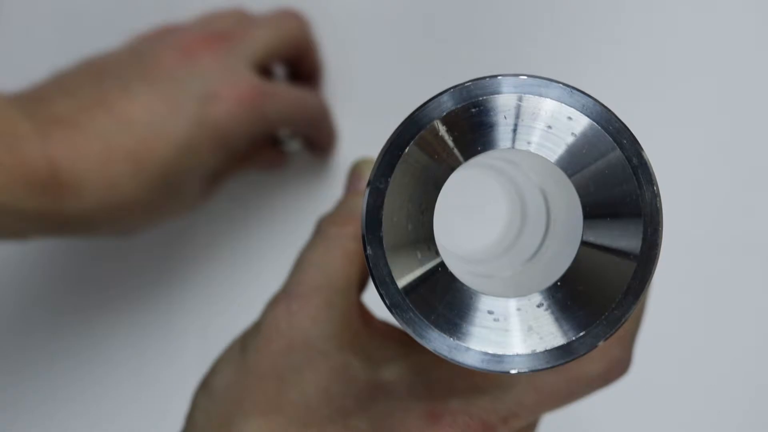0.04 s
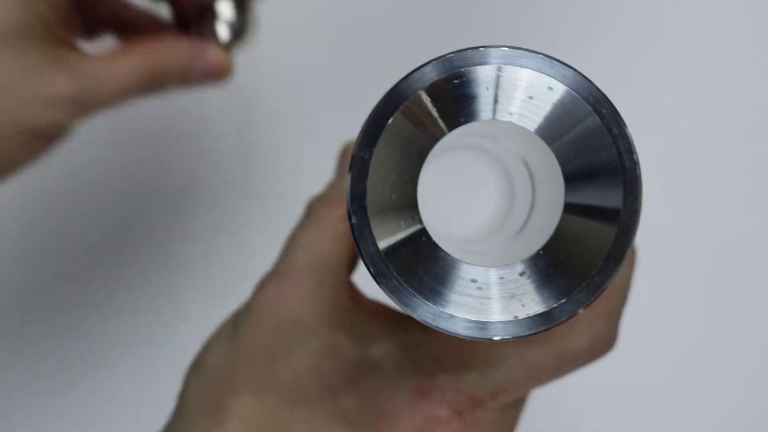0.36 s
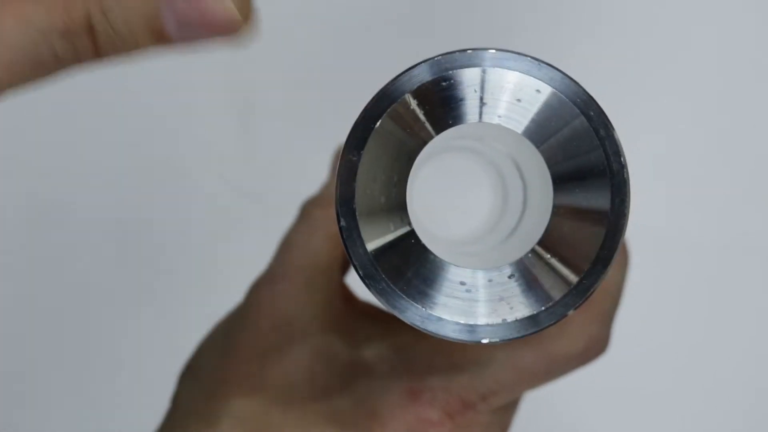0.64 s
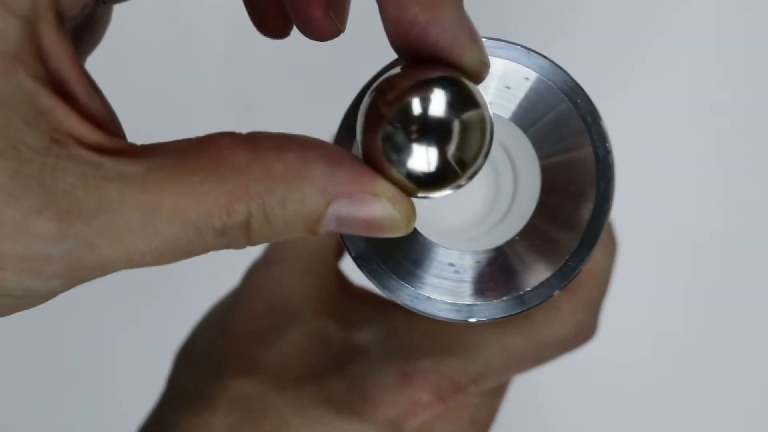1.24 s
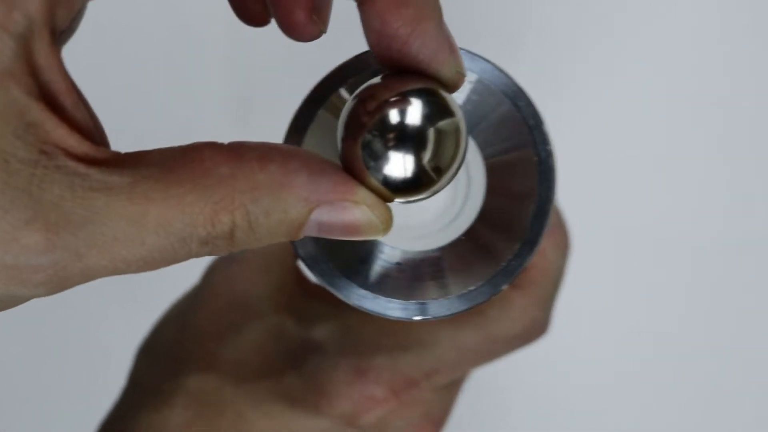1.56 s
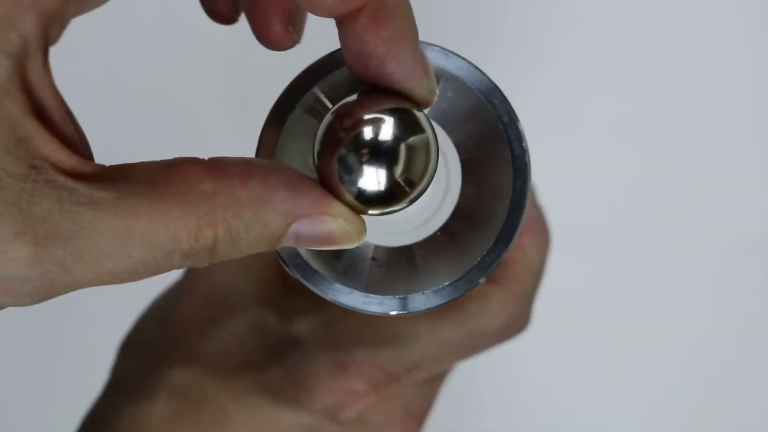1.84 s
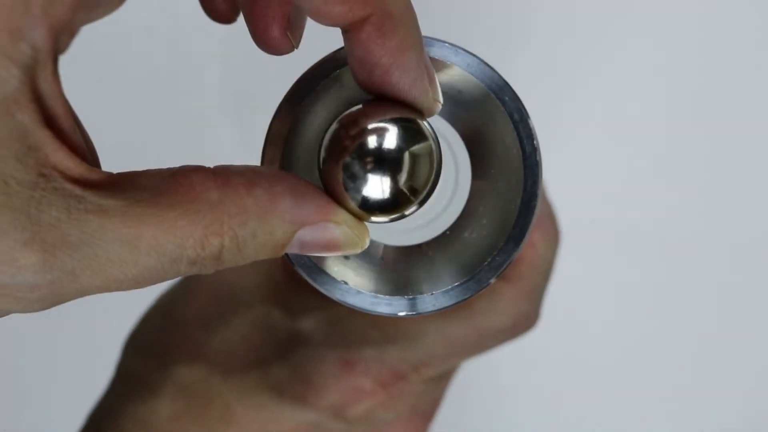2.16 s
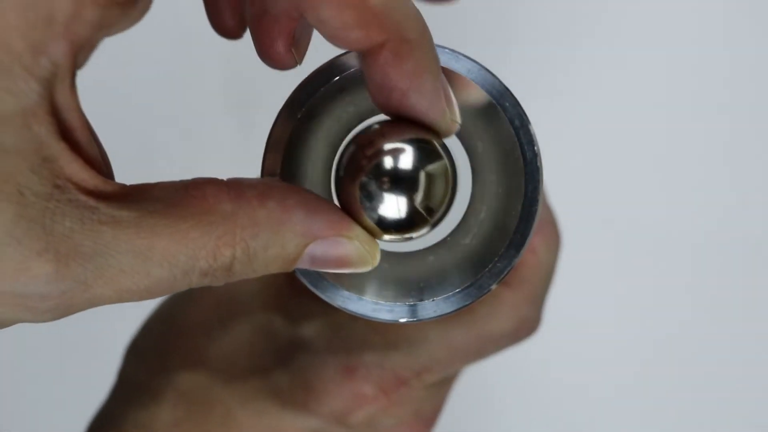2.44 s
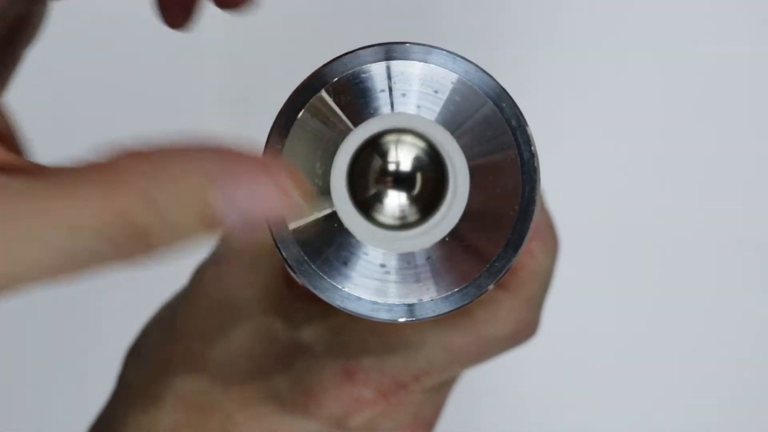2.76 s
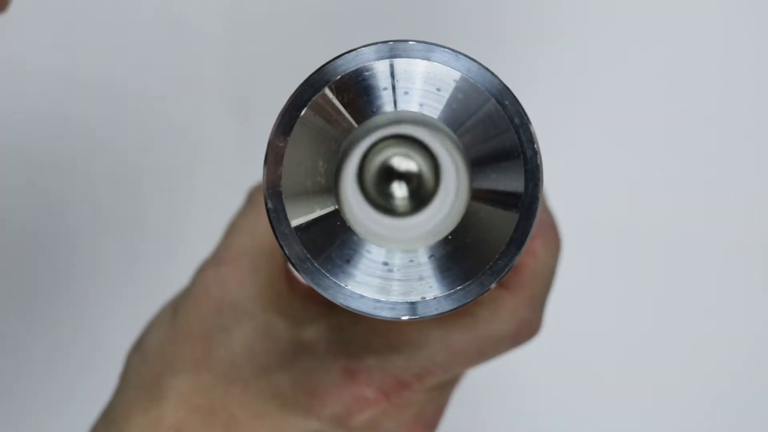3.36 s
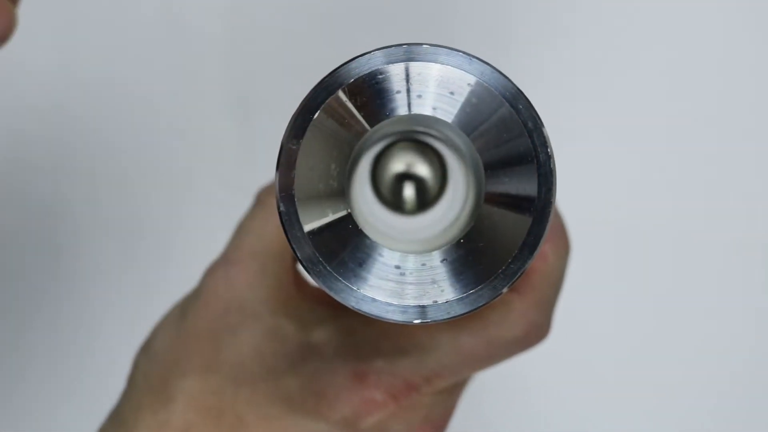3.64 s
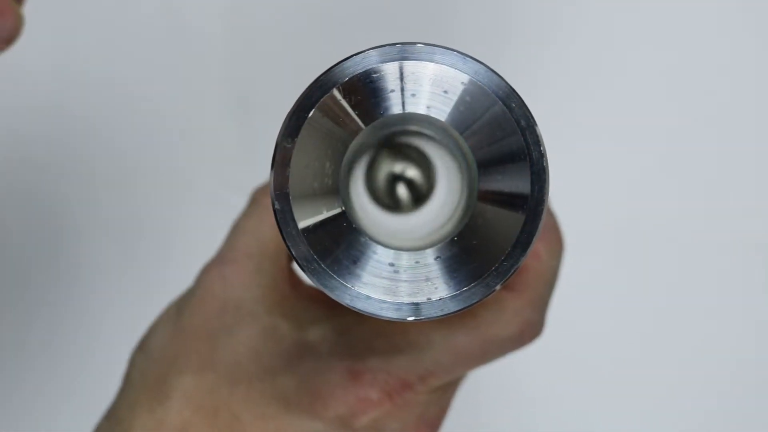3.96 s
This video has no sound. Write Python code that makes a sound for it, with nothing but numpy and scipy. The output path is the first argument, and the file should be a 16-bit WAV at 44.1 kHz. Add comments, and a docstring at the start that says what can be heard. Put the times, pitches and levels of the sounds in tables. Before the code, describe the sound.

Soft knock of a steel ball being picked up, then faint hand rumble, rubbing and clicks.

```python
"""A knock dies away under a brief swish of skin as a hand picks a steel ball off a table.
Moving hands rumble in the microphone and softly bump a metal tube held in the other hand.
Fingers rub as they ease the ball in; it sinks almost silently, with a few faint clicks.
Steady ventilation noise, hum and a thin electrical whine fill the quiet room."""
import sys
import numpy as np
from scipy import signal
from scipy.fft import rfft, irfft, next_fast_len
from scipy.io import wavfile

SR = 44100
rng = np.random.default_rng(int(sys.argv[2]) if len(sys.argv) > 2 else 0)


def bounce(signal):
    """Save signal as a 16-bit WAV file at the path given by the first command-line argument."""
    frames = np.transpose(np.atleast_2d(signal))
    limited = np.clip(frames, -1, 1)
    pcm = np.round(limited * 32767).astype(np.int16)
    wavfile.write(sys.argv[1], SR, pcm)


N = 176400


def amp(db):
    """Decibels to gain."""
    return 10 ** (np.asarray(db) / 20)


def unit(x):
    """Scale to rms 1."""
    return x / np.sqrt(np.mean(x ** 2) + 1e-30)


def clock():
    """Sample times in s."""
    return np.arange(N) / SR


def filtered(x, response):
    """Filter x by a gain function of frequency."""
    size = next_fast_len(N + SR // 2)
    return irfft(rfft(x, size) * response(np.fft.rfftfreq(size, 1 / SR)), size)[:N]


def coloured(x, spectrum):
    """Shape x by (f/Hz, level/dB) points on a log frequency axis."""
    points_hz, db = np.transpose(spectrum)
    return filtered(x, lambda hz: amp(np.interp(np.log(hz + 1), np.log(points_hz + 1), db)))


def noise(spectrum):
    """Coloured noise, rms 1."""
    return unit(coloured(rng.standard_normal(N), spectrum))


def narrow(centre_hz, width_hz):
    """Narrowband noise, rms 1: a fuzzy tone."""
    white = rng.standard_normal(N)
    return unit(filtered(white, lambda hz: 1 / (1 + (2 * (hz - centre_hz) / width_hz) ** 2)))


def ring(start_s, modes, attack_s):
    """Damped modes (f/Hz, level/dB, t60/s), struck once."""
    t = np.maximum(clock() - start_s, 0)
    attack = 1 - np.exp(-t / attack_s)
    return attack * sum(amp(db - 60 * t / t60) * np.sin(2 * np.pi * hz * t) for hz, db, t60 in modes)


def stroke(peak_s, rise_db_per_s, fall_db_per_s):
    """Gain that swells to 1 and fades, linear in dB."""
    t = clock() - peak_s
    return amp(np.minimum(rise_db_per_s * t, -fall_db_per_s * t))


def echo(x, t60_s):
    """Convolve x with a diffuse room tail of unit energy."""
    t = clock()[:SR // 2]
    tail = rng.standard_normal(len(t)) * amp(-60 * t / t60_s)
    return signal.fftconvolve(x, tail / np.linalg.norm(tail))[:N]


# Ventilation spectrum: f/Hz, relative level/dB
AIR_SPECTRUM = [(59, -35), (100, -8), (140, -8.5), (184, -14), (201, -15.5), (264, -21.5), (333, -16),
                (411, -27), (447, -21), (508, -24), (640, -18.5), (697, -21), (1180, -17), (1660, -26),
                (2750, -35.5), (3770, -38), (4100, -34.5), (5280, -42.5), (15500, -47.5)]


def ventilation(walls_from_hz=820, fan_hz=124.5):
    """Steady air noise, its treble coloured by nearby walls, and a wavering fan hum."""
    air = noise(AIR_SPECTRUM)
    walls = filtered(echo(air, t60_s=0.23), lambda hz: hz ** 2 / (hz ** 2 + walls_from_hz ** 2))
    fan = np.sqrt(2) * np.sin(2 * np.pi * fan_hz * clock())
    waver = 0.73 * narrow(fan_hz, width_hz=29)
    return amp(-65) * unit(air + amp(-10) * walls) + amp(-68) * unit(fan + waver)


# Room resonances: f/Hz, level/dB, width/Hz
ROOM_RESONANCES = [(197.5, -76, 13), (314, -83, 56), (1063, -91.5, 17), (4880, -91.5, 440)]


def room_hum():
    """Narrow room resonances over the low drone of the building."""
    hum = sum(amp(db) * narrow(hz, width_hz) for hz, db, width_hz in ROOM_RESONANCES)
    drone = amp(-61.5) * narrow(centre_hz=46.2, width_hz=43)
    return hum + drone


# Whine partials: f/Hz, rms level/dB
WHINE_PARTIALS = [(3000, -102), (4000, -102), (5000, -104), (6000, -103), (7000, -104), (8000, -108),
                  (9000, -106)]


def whine():
    """Faint, steady electrical tones."""
    return sum(amp(db) * np.sqrt(2) * np.sin(2 * np.pi * hz * clock()) for hz, db in WHINE_PARTIALS)


# Handling rumble envelope: t/s, level/dB
RUMBLE_ENVELOPE = [(0, -34.5), (.09, -29.5), (0.189, -28), (.28, -31.5), (.36, -39.5), (.46, -39),
                   (0.505, -37), (.56, -43.5), (.63, -38.5), (.68, -45.5), (.76, -42.5), (.81, -55.5),
                   (1.05, -49), (1.3, -51.5), (1.4, -57), (1.7, -59), (2.55, -54.5), (2.64, -52.5),
                   (2.72, -60), (2.79, -52.5), (2.9, -63), (2.97, -56), (3.1, -62), (3.65, -65.5),
                   (3.72, -42.5), (3.9, -41), (4, -43)]
# Handling rumble spectrum: f/Hz, relative level/dB
RUMBLE_SPECTRUM = [(10, 4), (20, 10), (40, 0.5), (65, -7.5), (120, -20), (190, -29), (280, -37), (500, -53),
                   (1200, -86)]


def handling():
    """Moving hands rumble in the microphone; the air near it sways slowly."""
    level_db = np.interp(clock(), *np.transpose(RUMBLE_ENVELOPE))
    rumble = amp(level_db) * noise(RUMBLE_SPECTRUM)
    sway = amp(-44.5) * narrow(centre_hz=6.32, width_hz=3.44)
    return rumble + sway


# Finger rubs: centre t/s, length/s, level/dB
RUB_SWELLS = [(1.53, 0.2, -77.5), (1.797, 0.33, -66), (2.016, 0.13, -70.5), (2.743, 0.35, -77)]
# Skin-on-steel spectrum: f/Hz, relative level/dB
RUB_SPECTRUM = [(100, 1.5), (200, 12), (400, -2.5), (800, 0.5), (1400, -1), (2500, -15), (5000, -31),
                (12000, -38)]


def finger_rubs():
    """Skin shifts on steel in soft swells as the ball is eased in."""
    t = clock()
    swells = sum(amp(db) * np.exp(-(2 * (t - at_s) / length_s) ** 2) for at_s, length_s, db in RUB_SWELLS)
    return swells * noise(RUB_SPECTRUM)


# Hand bumps on the tube: t/s, gain/dB, cut-off f/Hz
HAND_BUMPS = [(0.251, -33.5, 75), (0.313, -37, 500), (1.5756, -26, 322), (1.5915, -16.5, 50.6)]
# Thud modes: f/Hz, relative level/dB, t60/s
THUD_MODES = [(88, 5, 0.069), (145.6, 0.2, 0.068), (312, -9, 0.022)]


def tube_bumps():
    """Dull thuds, damped by the hand; each bump has its own cut-off, and a low cut-off rings only the low
    modes."""
    thuds = np.zeros(N)
    for start_s, gain_db, cutoff_hz in HAND_BUMPS:
        modes = [(hz, db - 10 * np.log10(1 + (hz / cutoff_hz) ** 4), t60) for hz, db, t60 in THUD_MODES]
        thuds += amp(gain_db) * ring(start_s, modes, attack_s=0.0059)
    return thuds


# Tick modes: f/Hz, relative level/dB, t60/s
LIGHT_TICK_MODES = [(2550, 0.5, 0.012), (3460, -3, 0.0063), (3780, -10, 0.0071), (5900, -14, 0.011)]


def tick():
    """One last light tick."""
    return amp(-49) * ring(start_s=3.9728, modes=LIGHT_TICK_MODES, attack_s=0.0005)


# Ball-to-wall contacts: t/s, gain/dB
WALL_CONTACTS = [(1.998, -56), (3.5952, -41.5)]
# Damped tube modes: f/Hz, relative level/dB, t60/s
WALL_MODES = [(530, 1, 0.0052), (980, 6.5, 0.0058), (3180, -15.5, 0.01), (5100, -10.5, 0.0077),
              (8150, -18.5, 0.0073), (9700, -25, 0.015)]


def ball_contacts():
    """The ball clicks against the wall of the damped tube."""
    return sum(amp(db) * ring(start_s, WALL_MODES, attack_s=0.0005) for start_s, db in WALL_CONTACTS)


# Sliding skin spectrum: f/Hz, relative level/dB
SWISH_SPECTRUM = [(1500, -22), (3800, -12), (4850, 12), (5700, -17), (7000, -22), (7900, 1), (8700, 9),
                  (9800, -4), (11000, 6), (12600, -1.5), (13800, -10), (15500, -8)]
# Brushed table spectrum: f/Hz, relative level/dB
BOOM_SPECTRUM = [(40, -7), (80, -2.5), (125, -1), (190, -9.5), (270, -24), (450, -38), (900, -84)]


def table_brush():
    """The hand brushes the table: a bright swish of skin and a dull boom."""
    swish = stroke(peak_s=0.071, rise_db_per_s=64, fall_db_per_s=96) * noise(SWISH_SPECTRUM)
    boom = stroke(peak_s=0.061, rise_db_per_s=101, fall_db_per_s=86.5) * noise(BOOM_SPECTRUM)
    return amp(-67) * swish + amp(-38) * boom


# Clear modes of the knock: f/Hz, relative level/dB, t60/s
CLEAR_MODES = [(1085, -7, 0.19), (1137, 2, 0.055)]


def knock_ring(start_s):
    """Brief clear ring of a knock on the ball."""
    return amp(-40.5) * ring(start_s, CLEAR_MODES, attack_s=0.0012)


# Fingernail click spectrum: f/Hz, gain/dB
NAIL_SPECTRUM = [(2000, -27), (5000, -8), (6200, -3), (7300, -9), (8700, 4), (10000, -5), (11200, 0),
                 (13000, 2), (14200, -13), (15500, -21)]


def fingernail(start_s=0.163, t60_s=0.0065):
    """A nail catches the ball: a bright burst that stirs the knock's ring again."""
    t = clock() - start_s
    burst = (t > 0) * amp(-45.5 - 60 * np.abs(t) / t60_s) * rng.standard_normal(N)
    return coloured(burst, NAIL_SPECTRUM) + amp(-18) * knock_ring(start_s)


# Noise bands of the knock: f/Hz, level/dB, width/Hz, t60/s
KNOCK_BANDS = [(176, -47, 30, 0.25), (330, -54, 100, 0.54), (580, -68, 75, 0.12), (1060, -51, 110, .34),
               (3090, -67, 370, 0.24)]
# Room wash spectrum: f/Hz, relative level/dB
WASH_SPECTRUM = [(100, 3.5), (250, -11), (480, -4.5), (1100, -4.5), (1700, -17), (3000, -20), (5500, -27.5),
                 (9000, -38), (15000, -42)]


def ball_knock(wash_t60_s=0.99):
    """The ball leaves the table: a fading knock, a clear ring and their wash in the room."""
    t = clock()
    body = sum(amp(db - 60 * t / t60) * narrow(hz, width_hz) for hz, db, width_hz, t60 in KNOCK_BANDS)
    wash = amp(-50.5 - 60 * t / wash_t60_s) * noise(WASH_SPECTRUM)
    return body + knock_ring(start_s=0.00262) + wash


def scene():
    """All sources at one close microphone; the clicks get a faint room tail."""
    background = ventilation() + room_hum() + whine()
    hands = handling() + finger_rubs() + tube_bumps() + table_brush()
    clicks = tick() + ball_contacts() + fingernail()
    room_tail = amp(-11) * echo(clicks, t60_s=0.19)
    return (background + hands + clicks + room_tail + ball_knock())[None]


def record(dry, top_hz=15700):
    """Brick-wall low-pass."""
    return np.array([filtered(channel, lambda hz: hz < top_hz) for channel in dry])


dry = scene()
out = record(dry)
bounce(out)
```